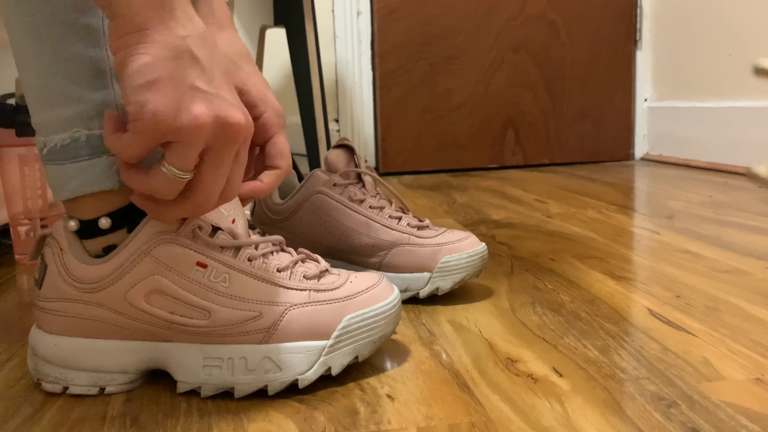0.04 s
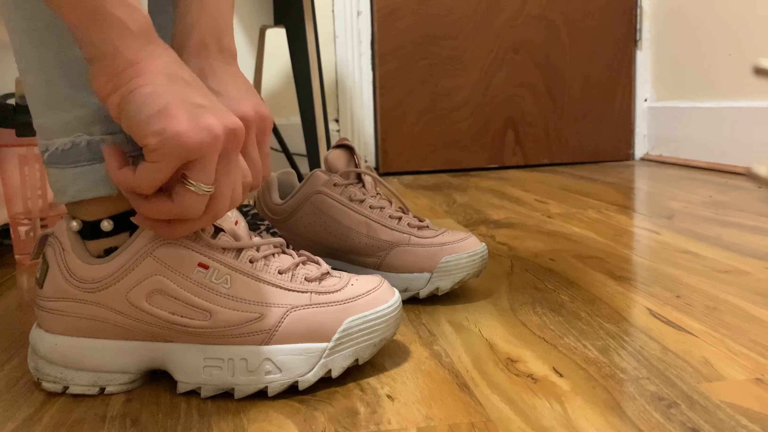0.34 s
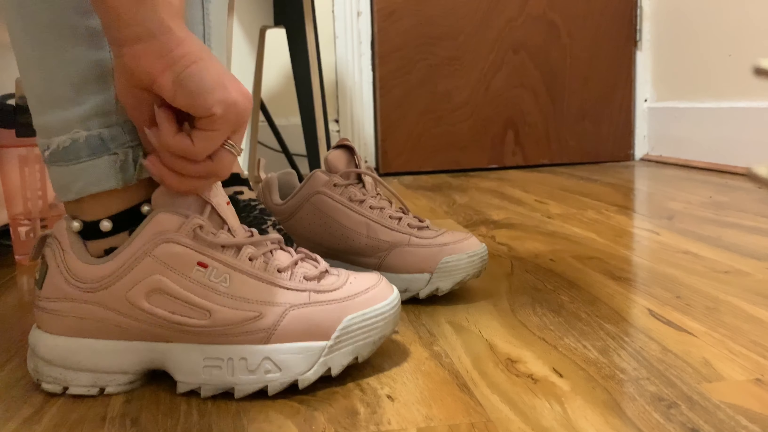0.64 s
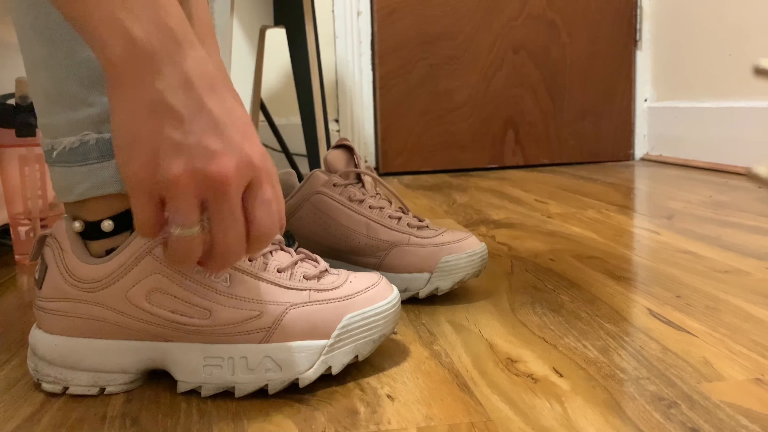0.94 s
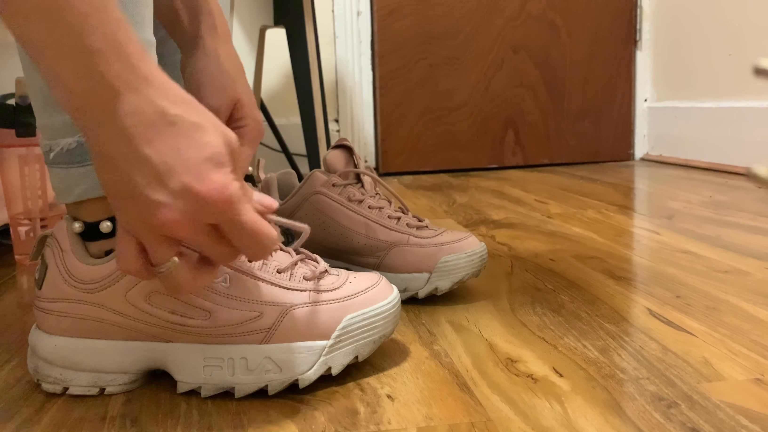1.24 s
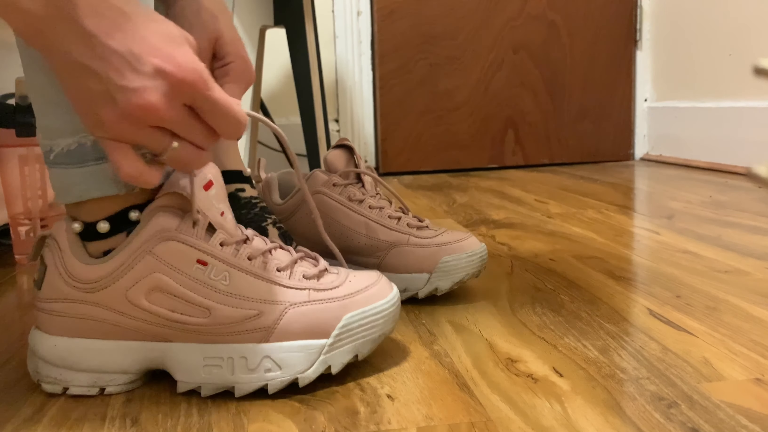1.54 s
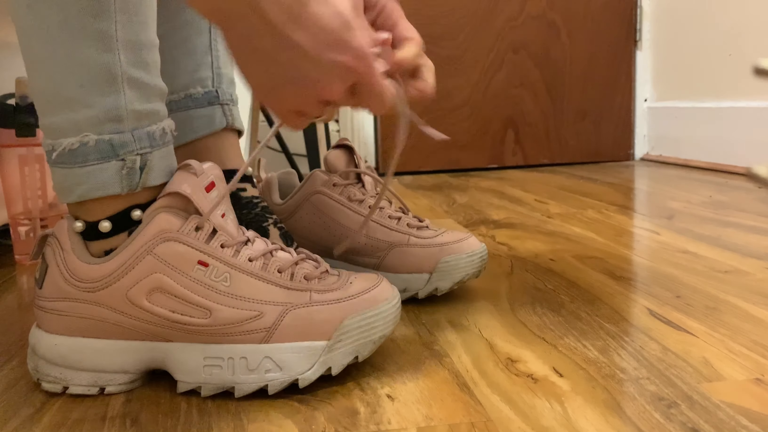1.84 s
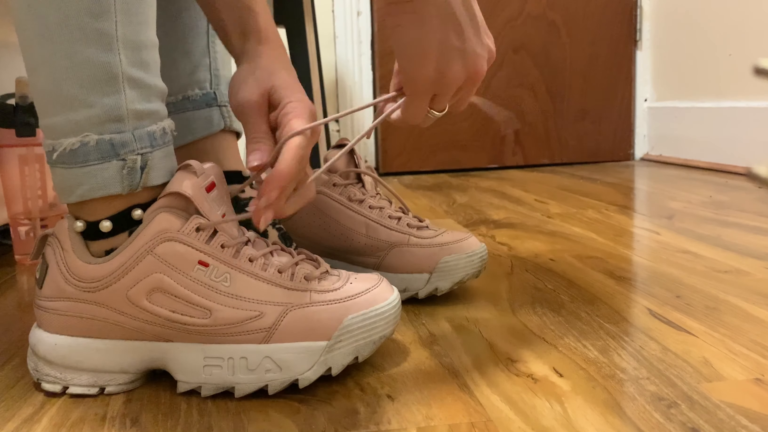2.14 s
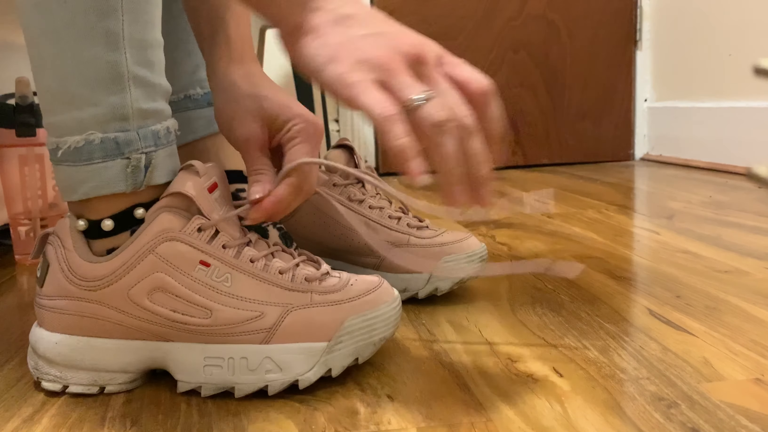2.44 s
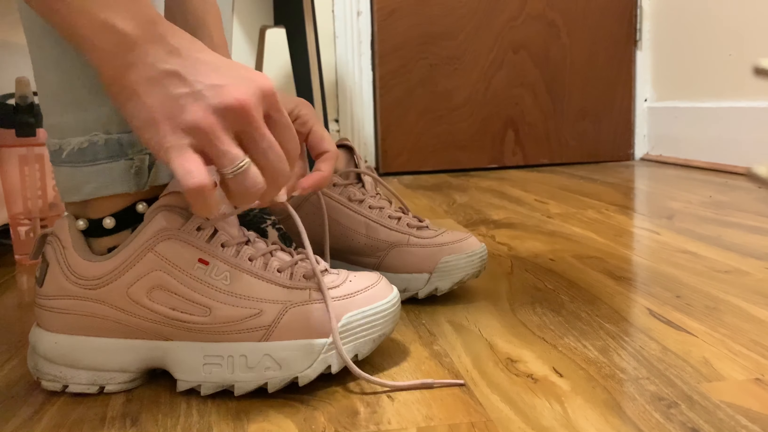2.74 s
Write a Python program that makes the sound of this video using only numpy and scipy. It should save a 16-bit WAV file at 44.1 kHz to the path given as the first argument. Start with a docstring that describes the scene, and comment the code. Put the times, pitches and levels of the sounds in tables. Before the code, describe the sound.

A foot is worked into a leather trainer on a wooden floor, close to the microphone in a small room with a steady low hum. For the first 1.6 seconds the leather rubs, creaks and rasps in quick pushes, cloth swishes and the sole bumps softly on the boards, with the strongest rub at about 1.4 seconds. Around 1.8 seconds a lace hisses thinly through the eyelets. Hard lace tips click sharply on shoe and floor at about 2.6 seconds, followed by a dull bump of the sole at 2.8. A short rasping tug comes at 3.4 seconds, then lighter rustles, ticks and lace zips, with a hollow tap on the shoe near 4.2. At about 5.1 seconds a lace tip gives one crisp click with a faint metallic ring, and a few small ticks and rustles die away by 5.6 seconds.

```python
"""Putting on and lacing a trainer

Someone works a foot into a trainer on a wooden floor and tightens the laces, close to the microphone
in a small room. The sole bumps the boards, sock and fingers rub the leather, laces hiss through
the eyelets, and their hard tips click on shoe and floor over a low room hum."""
import sys
import numpy as np
from scipy import signal
from scipy.fft import rfft, irfft, next_fast_len
from scipy.io import wavfile
from scipy.ndimage import uniform_filter1d

SR = 44100
rng = np.random.default_rng(int(sys.argv[2]) if len(sys.argv) > 2 else 0)


def store_pcm(level_fs):
    """Save levels as 16-bit WAV."""
    pcm = np.round(np.clip(level_fs, -1, 1) * 32767).astype(np.int16)
    wavfile.write(sys.argv[1], SR, np.atleast_2d(pcm).T)


N = 254452
TIME = np.arange(N) / SR
FFT_SIZE = next_fast_len(N)
BIN_HZ = np.maximum(np.fft.rfftfreq(FFT_SIZE, 1 / SR), 1)


def from_db(db):
    """Turn decibels into a number to multiply by."""
    return 10 ** (np.asarray(db) / 20)


def rms_one(x):
    """Scale a sound so that its average level (rms) is 1."""
    return x / np.sqrt(np.mean(x ** 2) + 1e-20)


def evened(x, span_s):
    """Hold a noise at level 1 from moment to moment."""
    return x / np.sqrt(uniform_filter1d(x ** 2, max(int(span_s * SR), 1)) + 1e-9)


def colour(x, spectrum):
    """Shape a noise by rows of (pitch in Hz, level in dB); it comes out at level 1."""
    size = next_fast_len(x.shape[-1])
    bin_hz = np.maximum(np.fft.rfftfreq(size, 1 / SR), 1)
    hz, db = np.transpose(spectrum)
    gains = from_db(np.interp(np.log(bin_hz), np.log(hz), db))
    return rms_one(irfft(rfft(x, size) * gains, size)[..., :x.shape[-1]])


def band(x, low_hz, high_hz, order=2):
    """Keep the sound between two pitches."""
    edges_hz = [low_hz, min(high_hz, .45 * SR)]
    return signal.sosfilt(signal.butter(order, edges_hz, "band", fs=SR, output="sos"), x)


def resonance(x, hz, width_hz):
    """Make a sound ring around one pitch; it comes out at level 1."""
    b, a = signal.iirpeak(hz, hz / width_hz, fs=SR)
    return rms_one(signal.lfilter(b, a, signal.lfilter(b, a, x)))


def drift(rate_hz):
    """A smooth random wobble, about 1 in size."""
    step, warm_up = 40, 2000
    pole = np.exp(-2 * np.pi * step * rate_hz / SR)
    noise = rng.standard_normal(N // step + warm_up + 2)
    slow = signal.lfilter([1], [1, -2 * pole, pole * pole], noise)[warm_up:]
    return np.interp(np.arange(N) / step, np.arange(len(slow)), rms_one(slow))


def add(track, s, sound):
    """Mix a short sound in, starting at s seconds."""
    start = max(round(s * SR), 0)
    track[start:start + len(sound)] += sound[:N - start]


def swell_db(t, length, ends_db=-11, shape=1.62):
    """A swell that reaches 0 dB at t = 0 and fades to either side; shape 1 is pointed, 2 is round."""
    return np.maximum(ends_db * abs(2 * t / length) ** shape, -200)


def friction(slips_per_s, spread_db, smooth_db):
    """Fibres catch and let go: tiny slips of uneven size over a smooth hiss."""
    sizes = from_db(spread_db * np.minimum(rng.exponential(1, N), 4)) * rng.choice([-1, 1], N)
    slips = sizes * (rng.random(N) < slips_per_s / SR)
    return rms_one(slips) + from_db(smooth_db) * rng.standard_normal(N)


def stick_slip(t, slips_per_s, jitter, decay_s, uneven_db, max_slips):
    """A grip builds and breaks at an uneven rate, giving a fading spike at every slip."""
    gaps, sizes = rng.standard_normal((2, max_slips))
    starts = np.append(0, np.cumsum(np.exp(jitter * gaps[1:]) / slips_per_s))
    latest = np.searchsorted(starts, t, "right") - 1
    return from_db(uneven_db * sizes[latest]) * np.exp((starts[latest] - t) / decay_s)


# The tone of the room's hum. Each row: pitch in Hz, level in dB.
HUM_SPECTRUM = [(25, -26.5), (45, 1.5), (65, 3), (90, 8.5), (130, 6), (190, -12.5), (280, -15),
                (500, -34.5), (1500, -68.5), (2600, -30), (5000, -72), (10000, -34.5), (16000, -40)]


def room_hum(hum_db=-53, air_db=-77, spread_rumble_db=-62):
    """The house rumbles steadily, a little differently left and right, with a faint hiss."""
    hum = microphones(colour(rng.standard_normal(N), HUM_SPECTRUM))
    air = rms_one(band(rng.standard_normal((2, N)), 60, 1500, order=1))
    spread_rumble = rms_one(band(rng.standard_normal((2, N)), 105, 187))
    return from_db(hum_db) * hum + from_db(air_db) * air + from_db(spread_rumble_db) * spread_rumble


# Quick runs of slips. Each row: loudest moment in seconds, length in seconds, level in dB,
# slips per second, body pitch in Hz, bright edge pitch in Hz, edge level in dB compared with the body.
RASP_RUNS = [(0.027, 0.14, -42.5, 170, 1290, 4670, -16.5), (0.33, 0.027, -44.5, 170, 1300, 4930, -13),
             (0.402, 0.065, -50, 130, 1240, 4670, -11), (0.587, 0.08, -47, 210, 930, 4400, -1),
             (0.904, 0.03, -46, 140, 860, 4700, -15), (1.08, 0.05, -52.5, 170, 910, 4600, -28),
             (1.338, 0.05, -46.5, 165, 950, 4500, -21), (1.401, 0.07, -37.5, 290, 917, 4600, -12),
             (3.389, 0.063, -42.5, 232, 620, 5100, -16), (3.412, 0.017, -41, 260, 450, 5200, -9),
             (3.405, 0.048, -48, 210, 1430, 5100, -7), (3.43, 0.025, -41.5, 240, 1000, 4600, -4.5)]
SLIP_DECAY_S = 0.00099


def rasps():
    """A tight lace or heel drags in a quick run of slips that swells and fades."""
    out, t = np.zeros(N), TIME[:SR // 4]
    for s, length, level_db, per_s, body_hz, edge_hz, edge_db in RASP_RUNS:
        spikes = stick_slip(t, per_s, jitter=0.28, decay_s=SLIP_DECAY_S, uneven_db=3, max_slips=200)
        slips = spikes * rng.choice([-1, 1], len(t))
        rasp = evened(taut_upper(slips, body_hz, edge_hz, edge_db), span_s=.02)
        start = max(s - t[-1] / 2, 0)
        add(out, start, from_db(level_db + swell_db(start + t - s, length)) * rasp)
    return out


# The notes of the shoe's tight upper part. Each row: pitch in Hz, width in Hz, level in dB.
UPPER_NOTES = [(485, 330, -5), (1022, 280, -6.5), (1413, 120, -16)]


def taut_upper(x, body_hz, edge_hz, edge_db, body_q=4.1, edge_q=3.5):
    """Each slip rings the hollow body, the tight upper and a bright edge; a higher q rings longer."""
    upper = sum(from_db(db) * resonance(x, hz, width_hz) for hz, width_hz, db in UPPER_NOTES)
    body = resonance(x, body_hz, body_hz / body_q)
    edge = resonance(x, edge_hz, edge_hz / edge_q)
    return body + upper + from_db(edge_db) * edge


# Pushes of the foot and pulls of the hands. Each row: loudest moment in seconds, length in seconds,
# leather level in dB, pitch of the shoe's hollow in Hz, cloth level in dB, lace level in dB.
PUSHES_AND_PULLS = [(0.029, 0.21, -47.5, 1340, -52, -59), (0.216, 1, -77, 1070, -60, -71),
                    (0.327, 0.26, -51.5, 810, -74, -62), (0.428, 0.25, -55, 680, -57.5, -73),
                    (0.543, 0.079, -47, 1170, -46.5, -75), (0.584, 0.086, -60, 950, -47, -42),
                    (0.608, 0.12, -46, 814, -52, -61), (0.786, 0.17, -56.5, 650, -53, -60),
                    (0.902, 0.063, -48, 900, -56, -62), (1.075, 0.1, -48, 860, -70, -68),
                    (1.116, 0.053, -64, 890, -51, -57), (1.251, 0.17, -56, 910, -55, -70),
                    (1.343, 0.089, -48, 905, -63, -75), (1.403, 0.13, -40, 890, -55.5, -56.5),
                    (1.445, 0.11, -45.5, 820, -49, -65), (1.611, 0.098, -55.5, 790, -73, -72),
                    (1.858, 0.34, -53.5, 726, -65.5, -62), (1.947, 0.15, -76, 750, -64.5, -56.5),
                    (2.18, 0.11, -66, 696, -84, -71), (2.307, 0.12, -60.5, 700, -67.5, -62.5),
                    (2.529, 0.068, -53.5, 750, -69.5, -67), (2.775, 0.18, -56.5, 636, -87, -93),
                    (2.933, 0.059, -62.5, 700, -86, -82), (3.107, 0.15, -70.5, 710, -65.5, -67.5),
                    (3.191, 0.07, -69, 1290, -64.5, -66.5), (3.346, 0.1, -57, 790, -64, -68),
                    (3.401, 0.1, -49, 635, -58, -52), (3.428, 0.059, -50, 945, -50.5, -52),
                    (3.597, 0.12, -60.5, 620, -71, -67), (3.676, 0.074, -56.5, 790, -62, -63),
                    (3.798, 0.27, -63, 700, -63.5, -62), (4.092, 0.29, -71, 810, -72, -76),
                    (4.339, 0.088, -97, 780, -73.5, -61.5), (4.399, 0.037, -82, 700, -69, -50.5),
                    (4.511, 0.12, -59, 620, -60, -62.5), (4.748, 0.23, -72.5, 750, -82, -75),
                    (4.85, 0.04, -60.5, 1440, -70, -71.5), (5.041, 0.077, -73.5, 750, -71.5, -61.5),
                    (5.229, 0.045, -95, 750, -60.5, -54), (5.617, 0.26, -91, 620, -72, -88.5)]


def strokes(fidget_db=(-81.5, -81, -81), fidget_swing_db=1, resting_hollow_hz=700):
    """Each stroke drags leather, cloth and lace together; in between, the fingers keep fidgeting."""
    power = from_db(np.array(fidget_db)[:, None] + fidget_swing_db * drift(rate_hz=11)) ** 2
    weighted_hz = power[0] * resting_hollow_hz
    for s, length, leather_db, hz, cloth_db, lace_db in PUSHES_AND_PULLS:
        near = slice(*np.searchsorted(TIME, [s - 2 * length, s + 2 * length]))
        levels_db = np.array([[leather_db], [cloth_db], [lace_db]])
        stroke = from_db(levels_db + swell_db(TIME[near] - s, length)) ** 2
        power[:, near] += stroke
        weighted_hz[near] += stroke[0] * hz  # the strongest rub has most say in the hollow's pitch
    leather_db, cloth_db, lace_db = 10 * np.log10(power)
    return leather_db, weighted_hz / power[0], cloth_db, lace_db


# The tone of rubbed leather. Each row: pitch in Hz, level in dB.
LEATHER_SPECTRUM = [(100, -37), (200, 2), (330, -1.5), (600, -1.5), (1000, 1.5), (1350, -2.5),
                    (1900, -15.5), (3500, -27.5), (8000, -55.5)]


def leather_rub(level_db, hollow_hz, hollow_db=8, hollow_octaves=0.24, judder_db=2, sliding_db=-12):
    """Coarse rubbing sounds through the shoe's hollow, whose pitch moves as foot and hands shift."""
    grit = friction(slips_per_s=700, spread_db=2.5, smooth_db=-4)
    spikes = stick_slip(TIME, slips_per_s=170, jitter=.4, decay_s=0.002, uneven_db=2.5, max_slips=3000)
    rub = colour(grit * (from_db(sliding_db) + spikes), LEATHER_SPECTRUM)
    spectrum, out = rfft(rub, FFT_SIZE), 0
    # Split the rub into half-octave bands and lift those near the hollow's pitch.
    for hz in 60 * 2 ** (np.arange(16) / 2):
        share = np.maximum(1 - 2 * abs(np.log2(BIN_HZ / hz)), 0)
        nearness = np.exp(-.5 * (np.log2(hollow_hz / hz) / hollow_octaves) ** 2)
        out = out + irfft(spectrum * share, FFT_SIZE)[:N] * from_db(hollow_db * nearness)
    return evened(out, span_s=0.015) * from_db(level_db + judder_db * drift(rate_hz=30))


# The notes of the hollow trainer. Each row: pitch in Hz, width in Hz, boost in dB.
SHOE_NOTES = [(450, 190, 3.5), (620, 160, 1.5), (790, 26, 0), (1046, 5.7, 5.5), (1290, 53, 2),
              (1530, 100, 3)]


def shoe_body(x, trim_db=-1):
    """The hollow trainer rings briefly, lifting the sound around its own notes."""
    out = x
    for hz, width_hz, boost_db in SHOE_NOTES:
        ring = signal.lfilter(*signal.iirpeak(hz, hz / width_hz, fs=SR), x)
        out = out + (from_db(boost_db) - 1) * ring
    return from_db(trim_db) * out


# The tone of sliding cloth. Each row: pitch in Hz, level in dB.
CLOTH_SPECTRUM = [(900, -2), (1700, 5.5), (2300, 6.5), (3000, 1.5), (3900, 4), (4700, 4), (5300, -0.5),
                  (6000, -3), (8000, -1), (16000, -57)]


def cloth_swish(level_db, scatter_db=-1, flutter_db=2):
    """Sock and trouser leg slide over a wide area, so left and right get a partly different swish."""
    patches = []
    for _ in range(3):
        fibres = friction(slips_per_s=900, spread_db=2, smooth_db=0.5)
        patches.append(floor_bounce(colour(fibres, CLOTH_SPECTRUM)))
    swish = rms_one(microphones(patches[0]) + from_db(scatter_db) * np.array(patches[1:]))
    return swish * from_db(level_db + flutter_db * drift(rate_hz=23))


# The tone of a sliding lace. Each row: pitch in Hz, level in dB.
LACE_SPECTRUM = [(3000, -27), (5800, -13), (7000, 4), (8200, 2.5), (10000, -2.5), (12800, -5), (14800, -5),
                 (16500, -12.5)]


def lace_hiss(level_db, flutter_db=2):
    """The fine braid of a lace hisses as it runs through its eyelets."""
    braid = friction(slips_per_s=13000, spread_db=15.5, smooth_db=8.5)
    hiss = floor_bounce(colour(braid, LACE_SPECTRUM))
    return hiss * from_db(level_db + flutter_db * drift(rate_hz=36))


def floor_bounce(x, delay_s=.0014, swing=.2, bounce_db=-8):
    """The floor sends back a quick echo whose delay wanders as the hands move, hollowing the hiss."""
    delay_samples = delay_s * SR * np.exp(swing * drift(rate_hz=1.5))
    echo = np.interp(np.arange(N) - delay_samples, np.arange(N), x, left=0)
    return rms_one(x + from_db(bounce_db) * echo)


# The tone of the floorboards' rumble. Each row: pitch in Hz, level in dB.
BOARD_SPECTRUM = [(25, -37), (45, 0.5), (68, 8.5), (105, -0.5), (135, 3), (165, -6.5), (205, 0),
                  (245, -12.5), (290, -18), (400, -28), (1000, -70), (3000, -93)]
# The sole meets the floor. Each row: loudest moment in seconds, level in dB, pitch in Hz,
# rise time in seconds.
SOLE_BUMPS = [(0.067, -45, 70.1, 0.18), (0.316, -38, 70, 0.024), (0.402, -34, 63.7, 0.013),
              (0.521, -49, 72.3, 0.13), (0.702, -34, 64, 0.011), (0.823, -39, 69.4, 0.014),
              (0.965, -32.5, 64.2, 0.041), (1.194, -31.5, 68.5, 0.048), (1.256, -40, 64, 0.0073),
              (1.513, -32.5, 61.7, 0.022), (1.613, -35.5, 186, 0.0079), (1.622, -33, 83.5, 0.015),
              (2.048, -41, 115, 0.0083), (2.086, -36, 64.7, 0.018), (2.179, -43.5, 119, 0.0043),
              (2.768, -31.5, 135.3, 0.0076), (2.801, -27.5, 69.3, 0.02), (2.865, -38.5, 90.6, 0.027),
              (2.932, -45, 85.64, 0.096), (3.677, -47, 76.9, 0.094), (3.811, -45.5, 74, 0.037),
              (3.8, -44, 166.5, 0.026), (4.263, -45.5, 86, 0.033), (4.791, -41, 80.8, 0.0094),
              (5.258, -53, 67.4, 0.0057), (5.446, -43, 100, 0.0058)]


def sole_bumps(rumble_db=-5, tone_db=1, decay_per_rise=1.65):
    """Weight rolls onto the rubber sole: the boards swing at a low note and rumble."""
    rumble = evened(colour(rng.standard_normal(N), BOARD_SPECTRUM), span_s=0.081)
    phases = rng.uniform(0, 2 * np.pi, len(SOLE_BUMPS))
    out = np.zeros(N)
    for (s, level_db, hz, rise), phase in zip(SOLE_BUMPS, phases):
        near = abs(TIME - s) < .5
        t = TIME[near] - s
        # The slower the weight comes on, the slower it goes.
        weight = np.exp(-np.where(t < 0, .5 * (t / rise) ** 2, t / (decay_per_rise * rise)))
        tone = from_db(tone_db) * np.sin(2 * np.pi * hz * t + phase)
        out[near] += from_db(level_db) * weight * (tone + from_db(rumble_db) * rumble[near])
    return out


# Single slips of the leather. Each row: start in seconds, peak level in dB, body pitch in Hz.
LEATHER_CATCHES = [(0.0876, -51, 1260), (0.105, -37.5, 1170), (0.2594, -36, 1140), (0.2793, -39, 1190),
                   (0.2984, -42, 1190), (0.3162, -37, 1190), (0.3708, -52, 1100), (0.38, -47, 1150),
                   (0.5022, -36, 1140), (0.527, -43, 1160), (1.304, -37, 930), (1.318, -38, 960),
                   (1.439, -45, 1000), (1.4454, -39, 910), (1.452, -33, 950), (1.461, -34, 940),
                   (1.4795, -34.5, 1100), (3.372, -45, 820)]


def leather_catches():
    """The leather catches once and lets go, ringing the tight upper."""
    out, t = np.zeros(N), TIME[:SR // 20]
    for s, peak_db, body_hz in LEATHER_CATCHES:
        burst = rng.choice([-1, 1], len(t)) * np.exp(-t / SLIP_DECAY_S)
        slip = taut_upper(burst, body_hz, edge_hz=4750, edge_db=-16.5)
        add(out, s, from_db(peak_db) * slip / abs(slip).max())
    return out


# The notes of a lace tip. Each row: multiple of its ring pitch, level in dB.
TIP_NOTES = [(0.766, -10), (1, -4.5), (1.57, -11)]
# The fine ringing left in tips and eyelets. Each row: pitch in Hz, level in dB compared with the hit.
AFTER_RING_NOTES = [(3790, -49.5), (3990, -53.5), (4885, -52.5), (6130, -51), (8170, -49), (8490, -49),
                    (9100, -49), (9990, -59.5)]
# Lace tips hit shoe and floor. Each row: start in seconds, level in dB, ring pitch in Hz,
# extra dB for the crack, extra dB for what goes to the walls.
TIP_HITS = [(0.2317, -20, 3500, -25, 0), (1.098, -34.5, 4000, 3.5, -6), (1.1175, -37, 6400, -20, -2),
            (1.1961, -23, 4170, -22, 5), (1.947, -47, 9600, -8, -3), (2.5511, -26, 3720, 1.5, 3),
            (2.5539, -29, 4170, 11.5, -2), (2.5746, -5, 9100, -7, -3), (2.574, -16, 4350, -18, -6.5),
            (2.659, -21.5, 9440, -12, 2), (2.672, -43.5, 4780, 8, -2.5), (2.965, -59, 4360, 15.5, -1),
            (3.304, -43.5, 6400, -3, 2), (3.6533, -38.5, 5300, 5, 1), (3.658, -27, 6880, -1.5, -1),
            (4.402, -39, 9400, -11, -6), (4.4055, -41, 9000, -5.5, 3), (5.0671, 0.5, 8430, -22, 3.5),
            (5.1675, -43.5, 7000, -4, -3), (5.283, -39.5, 8200, -9.5, -3), (5.3295, -35.5, 8100, -9, -2.5),
            (5.428, -43.5, 7650, -2, -4.5)]


def lace_tips(ring_db=6, ring_cycles=1.88, after_ring_s=.17, crack_rise_s=0.000087, crack_decay_s=.0012,
              spike_db=3, ring_send_db=-7.5, beaming_db_per_octave=10.5, snap_send_db=10):
    """A hard tip cracks and rings as it lands; returns the direct sound and what goes to the walls."""
    direct, to_walls, t = np.zeros(N), np.zeros(N), TIME[:SR // 6]
    onset = 1 - np.exp(-t / crack_rise_s)
    spike = 1. * (t == 0)
    after_ring = sum(from_db(db - 60 * t / after_ring_s) * np.sin(2 * np.pi * hz * t)
                     for hz, db in AFTER_RING_NOTES)
    for s, level_db, hz, crack_db, wall_db in TIP_HITS:
        notes = sum(from_db(db) * np.sin(2 * np.pi * ratio * hz * t) for ratio, db in TIP_NOTES)
        build_up = 1 - np.exp(-t * hz)  # takes about one cycle
        ring = from_db(level_db + ring_db) * notes * build_up * np.exp(-t * hz / ring_cycles)
        chatter = rng.choice([-1, 1], len(t)) * onset * np.exp(-t / crack_decay_s)
        impact = band(from_db(spike_db) * spike + chatter, 1800, 15000, order=1)
        crack = from_db(level_db + crack_db) * impact
        add(direct, s, ring + crack + from_db(level_db) * after_ring)
        # Added up over all directions, the crack reaches the walls as one clean snap.
        snap = np.sqrt(np.sum(crack ** 2)) * band(spike, 2400, 17000, order=1)
        # Low rings spread all around; high ones beam at the microphone.
        send_db = ring_send_db - beaming_db_per_octave * np.log2(hz / 6000)
        add(to_walls, s, from_db(wall_db) * (from_db(send_db) * ring + from_db(snap_send_db) * snap))
    return direct, to_walls


# Hollow taps on the shoe. Each row: start in seconds, level in dB, pitch in Hz, length in cycles,
# click level in dB compared with the tap.
SHOE_TAPS = [(0.2328, -35, 2310, 6.3, -21), (0.233, -31.5, 1100, 1.3, -18), (1.195, -37.5, 1330, 2.7, 2),
             (3.17, -53, 1610, 8.7, -17.5), (3.305, -48.5, 1400, 5.8, -21), (4.1589, -19.5, 1633, 4.9, -13),
             (4.2036, -40.5, 680, 2.7, -35), (4.667, -42, 950, 1.8, -24), (4.8502, -33.5, 1940, 2.7, -22)]


def hollow_taps(overtone_ratio=1.6, overtone_db=-16, click_decay_s=0.0014, click_send_db=4):
    """A tap gives a click and a very short note; returns the direct sound and what goes to the walls."""
    direct, to_walls, t = np.zeros(N), np.zeros(N), TIME[:SR // 50]
    for s, level_db, hz, cycles, click_db in SHOE_TAPS:
        swell = from_db(level_db) * np.sin(np.pi * np.minimum(t * hz / cycles, 1)) ** 2
        phase = 2 * np.pi * hz * t
        note = swell * (np.sin(phase) + from_db(overtone_db) * np.sin(overtone_ratio * phase))
        burst = rng.choice([-1, 1], len(t)) * np.exp(-t / click_decay_s)
        click = from_db(level_db + click_db) * band(burst, 2500, 7600)
        add(direct, s, note + click)
        add(to_walls, s, note + from_db(click_send_db) * click)
    return direct, to_walls


# Soft knocks and creaks of the leather. Each row: start in seconds, level in dB, pitch in Hz.
LEATHER_KNOCKS = [(.361, -39.5, 750), (.455, -41.5, 1190), (.8005, -38.5, 760), (.901, -39.5, 1130),
                  (1.006, -45.5, 810), (1.052, -39.5, 790), (1.118, -33.5, 890), (1.289, -45.5, 850),
                  (1.563, -43.5, 670), (2.353, -48.5, 716), (2.553, -41, 610), (2.599, -39, 920),
                  (2.965, -49.5, 720), (3.086, -52.5, 790), (3.235, -53, 780), (3.3705, -42, 637),
                  (4.161, -44.5, 820), (4.403, -44, 696), (4.699, -48.5, 650), (5.061, -39.5, 810),
                  (5.268, -65, 650), (5.419, -48, 820), (5.431, -55, 700)]


def leather_knocks(width_ratio=1.3, rise_s=0.001, thump_db=-7, thump_hz=300):
    """Padded leather gives a short, dull burst with no clear note, over a small thump of the sole."""
    out, t = np.zeros(N), TIME[:SR // 5]
    for s, level_db, hz in LEATHER_KNOCKS:
        decay_s = 0.0088 * (750 / hz) ** 1.6  # higher knocks die sooner
        skin, sole = rng.standard_normal((2, len(t)))
        burst = evened(band(skin, hz / width_ratio, hz * width_ratio), span_s=0.0033)
        thump = evened(band(sole, thump_hz / width_ratio, thump_hz * width_ratio), span_s=0.0082)
        envelope = (1 - np.exp(-t / rise_s)) * np.exp(-t / decay_s)
        add(out, s, from_db(level_db) * (burst + from_db(thump_db) * thump) * envelope)
    return out


# A lace whips through an eyelet. Each row: loudest moment in seconds, length in seconds, level in dB.
LACE_ZIPS = [(1.784, 0.13, -58), (1.917, 0.13, -57), (3.426, 0.039, -55), (3.807, 0.085, -53),
             (4.405, 0.012, -48)]


def lace_zips():
    """The ribs of the braid pass so fast that only a thin, high hiss is left."""
    braid = friction(slips_per_s=8800, spread_db=5, smooth_db=-9)
    hiss = resonance(braid, hz=13600, width_hz=6800)
    return hiss * sum(from_db(db + swell_db(TIME - s, length)) for s, length, db in LACE_ZIPS)


# The notes of a metal eyelet. Each row: pitch in Hz, level in dB, seconds to fade by 60 dB.
EYELET_NOTES = [(2610, 2.5, 0.11), (3075, -15.5, .2), (3960, -17.5, .16), (4450, -15.5, .16)]
# Nudges of the eyelet. Each row: start in seconds, level in dB.
EYELET_NUDGES = [(5.07, -44), (5.221, -58.5), (5.332, -60.5), (5.54, -60.5), (5.605, -69)]


def eyelet_rings():
    """The last tugs nudge a metal eyelet, and its thin notes linger faintly."""
    out, t = np.zeros(N), TIME[:SR // 2]
    ring = sum(from_db(db - 60 * t / fade_s) * np.sin(2 * np.pi * hz * t)
               for hz, db, fade_s in EYELET_NOTES)
    for s, level_db in EYELET_NUDGES:
        add(out, s, from_db(level_db) * ring)
    return out


# The tone of the room's echo. Each row: pitch in Hz, level in dB.
ECHO_SPECTRUM = [(60, -2), (300, 11), (1000, 0), (2000, 10), (4000, 8.5), (6000, 5), (9000, 3.5),
                 (14000, 2.5)]


def room_echo(x, level_db=-10, fade_60_db_s=0.2, build_s=0.0005, shared_db=-6, apart_hz=300):
    """Bare floor and walls send back a short, bright echo, partly alike on the left and right."""
    t = TIME[:SR * 3 // 5]
    envelope = from_db(-60 * t / fade_60_db_s) * (1 - np.exp(-t / build_s))
    tails = colour(rng.standard_normal((3, len(t))), ECHO_SPECTRUM) * envelope
    tails = tails / np.sqrt(np.sum(tails ** 2, axis=1, keepdims=True))
    echoes = signal.fftconvolve(x[None], tails, axes=1)[:, :N]
    # Low notes reach both sides alike, so only the higher ones get an echo for each side.
    apart = signal.sosfilt(signal.butter(1, apart_hz, "high", fs=SR, output="sos"), echoes[:2])
    return from_db(level_db) * (apart + from_db(shared_db) * microphones(echoes[2]))


# How sound from the shoe reaches the two microphones. Each row: pitch in Hz,
# how much louder the left is in dB, how far ahead the left is in radians.
LEFT_RIGHT_DIFFERENCES = [(20, -1.5, 0.5), (150, -2, -0.52), (315, 2, 0.07), (650, 6, 0.2), (1060, 8, 1.5),
                          (1630, 1.5, 1.4), (2520, -0.5, 4), (5300, -6.5, 7), (7420, 0.4, 2.5),
                          (21300, -1, -17)]


def microphones(x):
    """Make one sound stereo: each pitch reaches left and right with its own level and timing."""
    hz, pan_db, lead = np.transpose(LEFT_RIGHT_DIFFERENCES)
    sides = np.array([[.5], [-.5]])
    gains = from_db(sides * np.interp(BIN_HZ, hz, pan_db))
    gains = gains / np.sqrt(np.mean(gains ** 2, axis=0))
    phase_shifts = np.exp(1j * sides * np.interp(BIN_HZ, hz, lead))
    return irfft(rfft(x, FFT_SIZE) * gains * phase_shifts, FFT_SIZE)[:, :N]


def scene():
    """Mix the sounds of the shoe, their echo off the walls and the room's hum."""
    leather_db, hollow_hz, cloth_db, lace_db = strokes()
    leather = shoe_body(leather_rub(leather_db, hollow_hz) + leather_knocks())
    bumps = sole_bumps()
    lace = lace_hiss(lace_db) + lace_zips()
    tips, tips_to_walls = lace_tips()
    taps, taps_to_walls = hollow_taps()
    slips = rasps() + leather_catches()
    echo = room_echo(from_db(5) * leather + from_db(3) * bumps + from_db(-21.5) * lace
                     + from_db(3.5) * slips + taps_to_walls + tips_to_walls)
    direct = microphones(leather + bumps + lace + tips + slips + taps + eyelet_rings())
    return direct + cloth_swish(cloth_db) + echo + room_hum()


def record(dry):
    """Cut away the very highest treble, above 16000 Hz."""
    return signal.sosfilt(signal.ellip(10, .2, 80, 16000, fs=SR, output="sos"), dry)


dry = scene()
out = record(dry)
store_pcm(out)
```